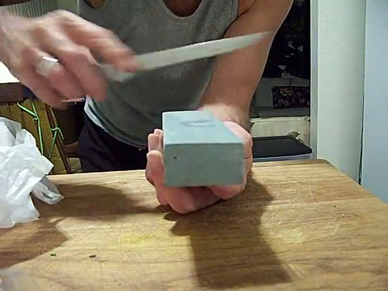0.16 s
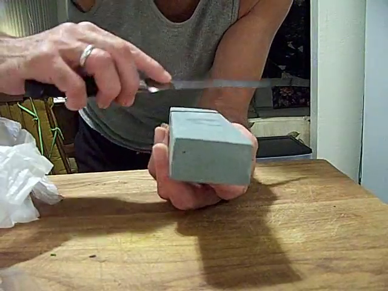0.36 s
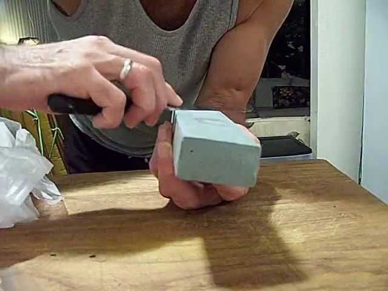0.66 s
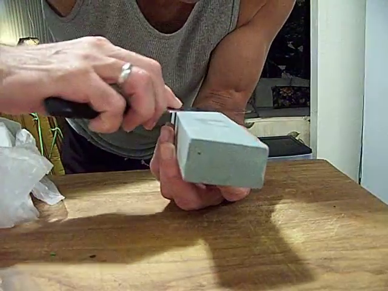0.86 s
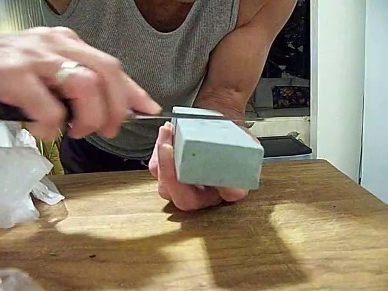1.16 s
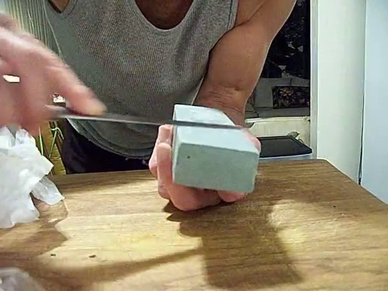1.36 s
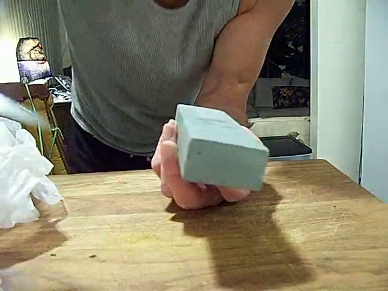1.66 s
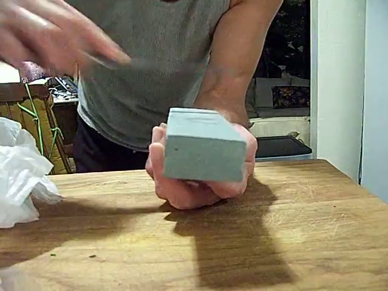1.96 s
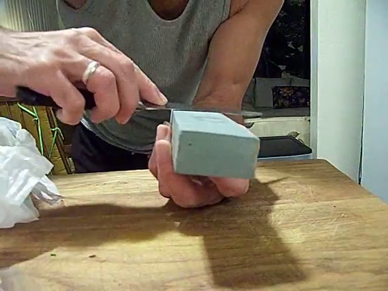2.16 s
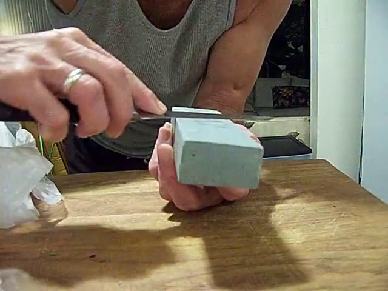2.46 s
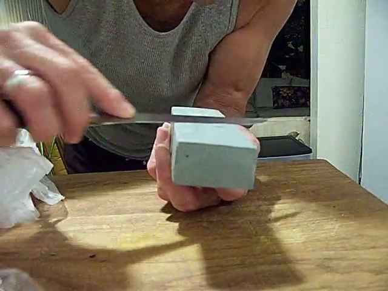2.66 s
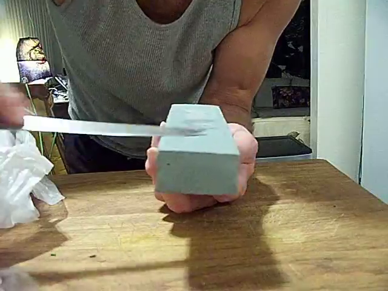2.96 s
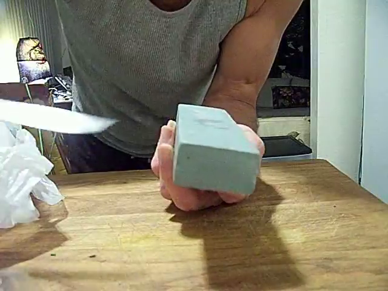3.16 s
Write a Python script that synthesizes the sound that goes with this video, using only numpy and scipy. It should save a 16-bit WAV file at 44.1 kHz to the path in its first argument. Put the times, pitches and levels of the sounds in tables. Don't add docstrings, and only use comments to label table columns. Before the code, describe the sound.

A knife is drawn twice along a sharpening stone. Faint room hum comes first, then a tick at 0.7 s and light contact clicks. From 0.9 to 1.55 s a bright, gritty scrape hisses, chirps and squeals, with a low pop near 1.24. After a pause, a longer scrape runs 2.1 to 3.04 s, catching sharply near 2.67 and ending with a thin ring. Small-room reverberation, close tinny microphone.

```python
import sys
import numpy as np
from scipy import signal
from scipy.fft import rfft, irfft, next_fast_len
from scipy.io import wavfile
from scipy.ndimage import uniform_filter1d, map_coordinates

SR = 44100
rng = np.random.default_rng(int(sys.argv[2]) if len(sys.argv) > 2 else 0)


def volts(x):
    e = np.asarray(x, float) / 20
    return 10 ** e


def wav_out(sig):
    wavfile.write(sys.argv[1], SR, np.round(np.clip(np.atleast_2d(sig).T, -1, 1) * 32767).astype(np.int16))


N = 145530
T = np.arange(N) / SR


def unit(x):
    return x / np.sqrt(np.mean(np.abs(x) ** 2) + 1e-20)


def along(points, hz):
    f, v = np.transpose(points)
    return np.interp(np.log(hz + 1), np.log(f + 1), v)


def wobble(rate):
    return map_coordinates(rng.standard_normal(4000), [T * rate])


def coloured(x, points):
    m = next_fast_len(N + 8192)
    cepstrum = irfft(np.log(volts(along(points, np.fft.rfftfreq(m, 1 / SR)))), m)
    cepstrum[1:m // 2] *= 2
    cepstrum[m // 2 + 1:] = 0
    return irfft(rfft(x, m) * np.exp(rfft(cepstrum)), m)[:len(x)]


def patchy(x, depth_db):
    z = signal.stft(x, nperseg=256)[2]
    field = uniform_filter1d(rng.standard_normal(z.shape), size=3, axis=0)
    field = uniform_filter1d(field, size=9, axis=1)
    return signal.istft(z * volts(depth_db * unit(field)), nperseg=256)[1][:N]


def resonate(x, hz, width_hz):
    turn = np.exp(2j * np.pi * np.cumsum(hz + np.zeros(len(x))) / SR)
    pole = np.exp(-np.pi * width_hz / SR)
    gain = np.sqrt(2 * (1 - pole ** 2) ** 3 / (1 + pole ** 2))
    return gain * (signal.lfilter([1], [1, -2 * pole, pole ** 2], x / turn) * turn).real


# t/s, friction level/dB, stone ring over friction level/dB, edge hiss centre f/Hz,
# share of the blade lying flat level/dB
STROKES = [
    [(0.896, -39, -6, 6520, 3.5), (1.078, -36, -16, 7730, -1), (1.146, -24, -17.5, 7500, -3.5),
     (1.2, -36, -14, 7780, -1), (1.422, -33.5, -25, 6750, -4.5), (1.468, -33, -14, 7320, -7.5),
     (1.496, -47, 9.5, 7700, 8.5), (1.524, -40.5, -22, 6860, 5.5), (1.55, -38.5, -23, 7340, 1)],
    [(2.103, -37.5, -2.5, 7000, -1), (2.169, -28, -29, 7370, -9.5), (2.195, -35, -20, 7336, -6),
     (2.579, -30, -20.5, 7335, -3.5), (2.639, -37.5, -14.5, 6800, -2.5), (2.681, -32.5, -26, 7320, 0),
     (2.783, -40, -22.5, 7260, -1.5), (3.019, -34, 2, 7140, 4), (3.04, -34.5, -14.5, 6930, 4)],
]
CREEP = [
    (.75, -58, -1, 6900, -4),
    (.83, -52, -1, 6800, 2),
    (.86, -45, 0, 6700, 6),
    (.893, -46, 0, 6700, 6),
]


def strokes():
    push, ring, flat = np.zeros((3, N))
    for rows in [CREEP, *STROKES]:
        s, db, ring_db, _, flat_db = np.transpose(rows)
        touch = np.clip(np.minimum(T - s[0], s[-1] - T) / 0.002, 0, 1)
        push += touch * volts(np.interp(T, s, db))
        ring += touch * volts(np.interp(T, s, db + ring_db))
        flat += touch * volts(np.interp(T, s, db + flat_db))
    rows = np.concatenate([CREEP[:-1], *STROKES])
    centre_hz = np.interp(T, rows[:, 0], rows[:, 3])
    force = grit()
    steel = blade(force * flat) + edge(force * push, force * flat, centre_hz)
    return scrape(force, flat) + steel + stone(force * ring * volts(2.3 * wobble(40)))


def grit():
    grains_per_s, spread_db, chatter_db = 5000, 2.5, 2.5
    size_db = spread_db * rng.exponential(size=N).clip(0, 3)
    grains = (rng.random(N) < grains_per_s / SR) * rng.standard_normal(N) * volts(size_db)
    chatter = (.3 * wobble(29.5) + wobble(150)).clip(-3, 1.8)
    return unit(grains * volts(chatter_db * chatter))


# f/Hz, level/dB
SCRAPE = [(600, -43), (1500, -25), (3000, -17.5), (4300, 0.5), (5000, -5.5), (6300, 2.5), (7300, -4),
          (9000, -2.5)]


def scrape(force, flat):
    return volts(-9.5) * flat * patchy(unit(coloured(force, SCRAPE)), 4.5)


# multiple of the hiss centre, width f/Hz, level/dB over friction
EDGE = [(.93, 218.4, -10.5), (0.991, 220, -5.5), (1.028, 220, -13.5), (1.078, 218.4, -8.5),
        (1.138, 224.4, -11), (1.199, 220, -11)]
# f/Hz, width f/Hz, level/dB
FLAT = [(5000, 270, -12), (5340, 200, -14), (5740, 390, -21.5), (6300, 49, -14.5)]


def edge(push, flat, centre_hz):
    def mode(drive, hz, width_hz, db):
        flicker = volts(db - 12.0 + 3 * wobble(25.07))
        return flicker * resonate(drive, hz * (1 + .011 * wobble(12)), width_hz)

    hiss = sum(mode(push, k * centre_hz, width_hz, db) for k, width_hz, db in EDGE)
    return hiss + sum(mode(flat, *row) for row in FLAT)


# t/s, factor on the blade's mode frequencies
BEND = [(.8, 1.36), (1.0, 1.06), (1.22, 1.52), (1.33, 1.23), (1.55, 1.05), (2.1, .85), (2.3, 1.1),
        (2.55, 1.33), (2.63, 1.66), (2.76, 1.24), (3.05, 1.16)]
# f/Hz, width f/Hz, level/dB over friction
BLADE = [(998, 78, -29.5), (1773, 72, -31), (2497, 250, -25), (2930, 910, -16)]


def blade(force):
    bend = uniform_filter1d(np.interp(T, *np.transpose(BEND)), size=1500)
    out = np.zeros(N)
    for hz, width_hz, db in BLADE:
        out += volts(db - 4 + 3.5 * wobble(10)) * resonate(force, hz * bend, width_hz)
    return out


# f/Hz, width f/Hz, level/dB
STONE = [(2627, 75, -0.5), (2575, 180, -13), (3127, 280, -14.5)]


def stone(force):
    return sum(volts(db) * resonate(force, hz, width_hz) for hz, width_hz, db in STONE)


# t/s, peak level/dB, f/Hz
CATCHES = [
    [(0.8344, -41, 6900), (0.8563, -34, 6960), (0.8633, -32.5, 6820), (0.8972, -18.5, 6820),
     (0.9326, -30, 6840), (0.9531, -25.5, 7110), (1.0284, -24, 7110), (1.0509, -25, 8070),
     (1.0888, -20, 7450), (1.1082, -15.5, 7430), (1.1262, -16, 7500), (1.1487, -15, 7520),
     (1.2135, -22, 7630), (1.2404, -16.5, 7930), (1.2828, -26.5, 7720), (1.3008, -17.5, 7830),
     (1.3203, -17.5, 6770), (1.3771, -20.5, 7260), (1.4235, -21.5, 6760), (1.4415, -19, 7090),
     (1.4609, -15, 7610), (1.5158, -22.5, 6890)],
    [(2.1038, -28.5, 7020), (2.1278, -27.5, 6480), (2.1423, -17.5, 7020), (2.1522, -21, 7630),
     (2.1637, -21, 7750), (2.2101, -26, 7000), (2.235, -29.5, 7740), (2.2565, -25, 7650),
     (2.3199, -18, 7450), (2.3498, -18, 7340), (2.3687, -18, 7790), (2.3982, -19, 7540),
     (2.4092, -20, 7120), (2.4251, -15, 7480), (2.4815, -24, 7550), (2.488, -25, 7350), (2.5134, -19, 7520),
     (2.5374, -16.5, 7500), (2.5618, -18.5, 7270), (2.6262, -21, 7750)],
    [(2.6683, -12, 6940), (2.6804, -16.5, 7290), (2.7072, -14, 8000), (2.7444, -25, 7430),
     (2.8155, -24.5, 7400), (2.8988, -25, 7510), (2.9253, -21.5, 6700), (2.9607, -19, 6800),
     (2.9786, -16, 7320), (3.0071, -26, 6680), (3.0204, -16.5, 6770)],
]


def catches():
    rise_s, t60_s = .001, .032
    out, t = np.zeros(N + SR), T[:SR // 20]
    for s, db, hz in np.concatenate(CATCHES):
        side, phase = rng.uniform(-1, 1, size=2)
        near_hz = hz * (1 + .07 * np.sign(side) * (.5 + abs(side)))
        pair = np.sin(2 * np.pi * hz * t) + .5 * np.sin(2 * np.pi * (near_hz * t + phase))
        decay = volts(db - 3 - along(MIC, hz) - 60 * t / t60_s)
        out[round(s * SR):][:len(t)] += decay * (1 - np.exp(-t / rise_s)) * pair
    return out[:N]


# start t/s, length t/s, from f/Hz, to f/Hz, level/dB
SQUEALS = [(.896, 0.13, 6750, 7010, -33.5), (1.1, 0.059, 7450, 7400, -29), (1.205, 0.093, 7690, 7780, -35),
           (1.387, 0.091, 7510, 6700, -32.5), (1.454, 0.04, 7435, 7700, -29),
           (1.454, 0.063, 8540, 7820, -38), (1.499, 0.039, 6950, 7130, -34.5),
           (2.125, 0.058, 7260, 7140, -47), (2.144, 0.03, 7980, 7800, -42),
           (2.533, 0.099, 7540, 6770, -31.5), (2.518, 0.034, 6300, 6830, -34),
           (2.11, 0.27, 5450, 5360, -52.5), (2.666, 0.034, 6966, 7450, -22),
           (2.698, 0.021, 7410, 8250, -26.5), (2.78, 0.061, 4600, 5080, -46.5),
           (2.917, 0.097, 6850, 6660, -33.5), (2.95, 0.062, 7250, 7670, -39), (1.31, 0.08, 5680, 6270, -39)]
WHINES = [(.94, .07, 410, 420, -59), (.99, .09, 1900, 2020, -55), (1.07, .11, 3300, 3700, -54),
          (1.3, .09, 1200, 1190, -64), (1.42, .12, 680, 1050, -63), (1.36, .08, 3400, 3500, -60),
          (2.38, .22, 3150, 3800, -62), (2.37, .1, 2050, 2250, -59), (1.48, .04, 2750, 3300, -50),
          (1.455, .055, 2620, 2630, -41), (2.988, .05, 2600, 2640, -34.5), (2.3, .25, 1130, 1300, -63),
          (2.15, .1, 760, 830, -64), (2.26, .27, 880, 880, -61), (2.72, .12, 300, 305, -61),
          (2.82, .06, 1200, 1180, -63), (2.85, .11, 3750, 3150, -55), (2.57, .14, 3700, 4200, -61),
          (2.69, .16, 4250, 3850, -62), (2.97, .07, 2300, 2400, -52), (3.02, .05, 1580, 1600, -61)]


def squeals(rows, rough):
    out = np.zeros(N + SR)
    for s, length, from_hz, to_hz, db in rows:
        u = np.arange(round(length * SR)) / (length * SR)
        hz = from_hz + (to_hz - from_hz) * u * (1.4 - 0.46 * u)
        noise = unit(resonate(rng.standard_normal(len(u)), hz, from_hz / 28))
        tone = np.sqrt(2) * np.sin(2 * np.pi * np.cumsum(hz) / SR)
        level = volts(db - along(MIC, hz)) * np.sqrt(np.sin(np.pi * np.sqrt(u)))
        out[round(s * SR):][:len(u)] += level * (rough * noise + (1 - rough) * tone)
    return out[:N]


# t/s, peak level/dB, stone over it level/dB, thud over it level/dB
TAPS = [(0.6781, -20.5, -18, -28.5), (0.7549, -33, -31, -34), (0.7724, -35, -33, -25),
        (0.8006, -31.5, -28, -31), (0.8966, -28, -10, -29), (1.1492, -24, -44, -36), (1.319, -23, -35, -29),
        (1.5365, -24, -49, -31), (2.1045, -25, -13.5, -21.5), (2.4229, -27, -16.5, -27),
        (2.6672, -29, -28, -26), (2.707, -27, -40, -28)]
# f/Hz, level/dB
THUD = [(300, -28.5), (700, 8), (1100, 6.5), (2000, 7.5), (3000, -27.5), (3600, -30)]


def taps():
    crack_t60_s, scuff_t60_s, thud_t60_s = .01, .07, 0.092
    out, thud = np.zeros((2, N + SR))
    blows, t = np.zeros(N), T[:SR // 4]
    for s, db, stone_db, thud_db in TAPS:
        i = round(s * SR)
        fall = volts(-60 * t / crack_t60_s) + 0.74 * volts(-60 * t / scuff_t60_s)
        out[i:][:len(t)] += volts(db - 16.5) * fall * rng.standard_normal(len(t))
        thud[i:][:len(t)] += volts(db + thud_db - 60 * t / thud_t60_s) * rng.standard_normal(len(t))
        blows[i] = volts(db + stone_db + 23.5)
    return coloured(out[:N], SCRAPE) + coloured(thud[:N], THUD) + stone(blows)


# f/Hz, t60 t/s
ROOM = [(300, 1), (2600, 0.32), (7500, 0.45)]


def room(x):
    hz, t, z = signal.stft(rng.standard_normal(SR // 2), SR, nperseg=256)
    tail = signal.istft(z * volts(-60 * t / along(ROOM, hz)[:, None]), SR, nperseg=256)[1]
    delayed = np.pad(x, (200, 0))
    return signal.fftconvolve(delayed, tail / np.linalg.norm(tail))[:N]


# f/Hz, rms level/dB, unsteadiness level/dB
HUM = [(46.6, -63, -7), (53.5, -54.5, 0.5), (116.8, -66, 3.5), (203.4, -58, 3), (239.7, -60.5, 3.5),
       (7370, -87, 0.5), (8000, -81.5, 2.5), (8000, -82.5, 1.5)]
# f/Hz, level/dB
AIR = [(20, 0.5), (60, -8.5), (400, -10), (700, -20), (3200, -29), (4500, -35), (5500, -33.5),
       (9000, -32.5)]


def appliances():
    hum = np.zeros(N)
    for hz, db, sway_db in HUM:
        level = volts(db + sway_db * wobble(2.5).clip(-1, 1)) * np.sqrt(2)
        hum += level * np.sin(2 * np.pi * (hz * T + rng.random() + 0.019 * wobble(2.4)))
    air = patchy(unit(coloured(rng.standard_normal(N), AIR)), 1.5)
    return hum + volts(-55) * air


def scene():
    knife = strokes() + catches() + squeals(SQUEALS, .75) + squeals(WHINES, .75) + taps()
    return (knife + volts(-6.5) * room(knife) + appliances())[None]


# f/Hz, level/dB
MIC = [(20, -0.5), (3000, 0.5), (3700, -5.5), (4150, -18), (4600, 0), (7700, 14), (8500, 4), (9300, -33)]


def microphone(x):
    return coloured(x, MIC)


def pop():
    start_s, rise_s, fall_s, sag_s = 1.2425, 0.00011, 0.0072, 0.021
    t = np.clip(T - start_s, 0, None)
    swing = np.exp(-t / fall_s) - 0.37 * np.exp(-t / sag_s)
    return volts(-22) * (t > 0) * (1 - np.exp(-t / rise_s)) * swing


def low_pass(x):
    return signal.sosfilt(signal.butter(12, 9410, fs=SR, output="sos"), x)


def record(dry):
    mix = (microphone(dry[0]) + pop())[None]
    return low_pass(mix)


dry = scene()
out = record(dry)
wav_out(out)
```